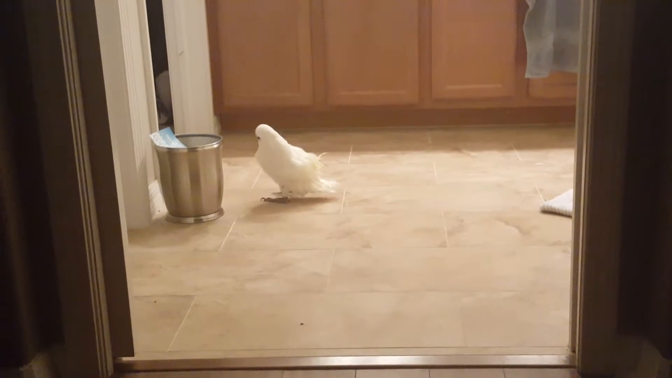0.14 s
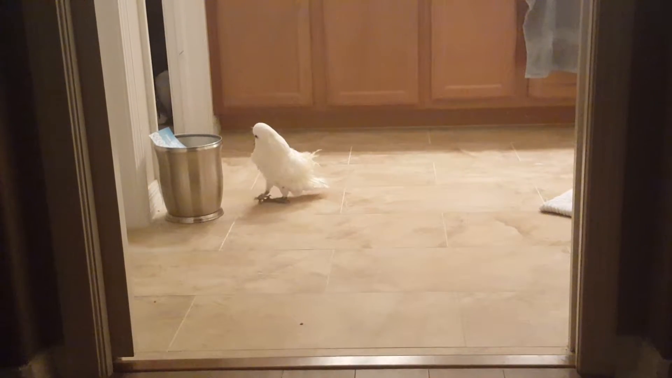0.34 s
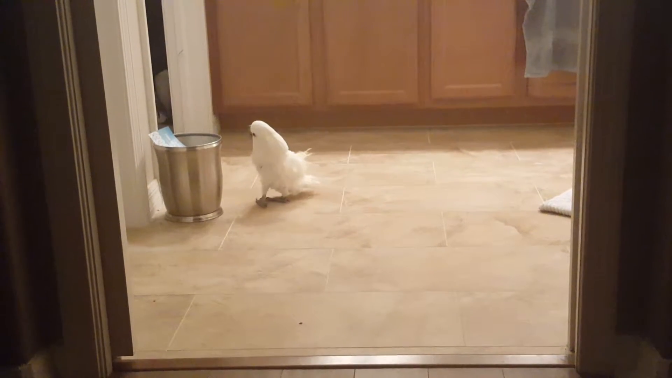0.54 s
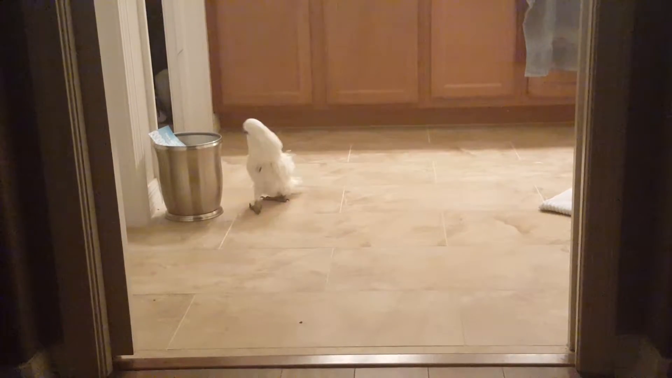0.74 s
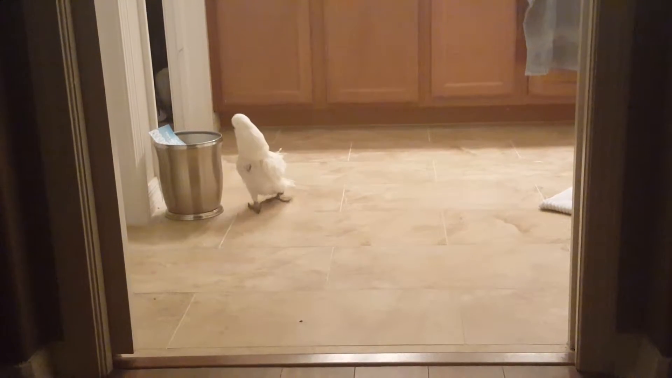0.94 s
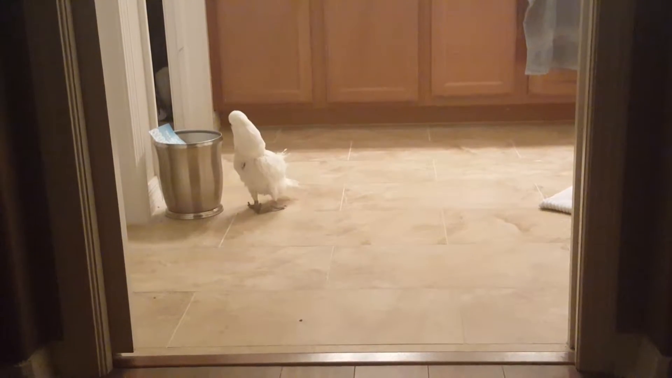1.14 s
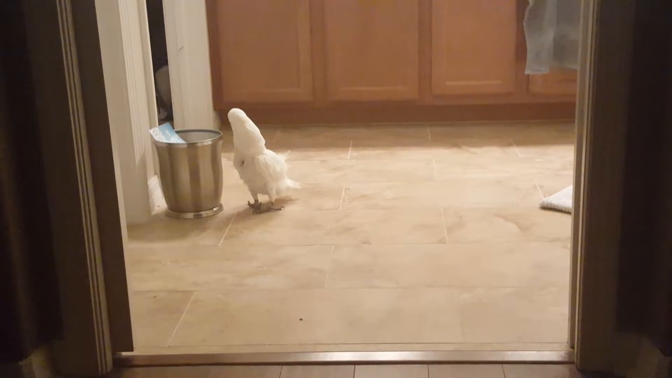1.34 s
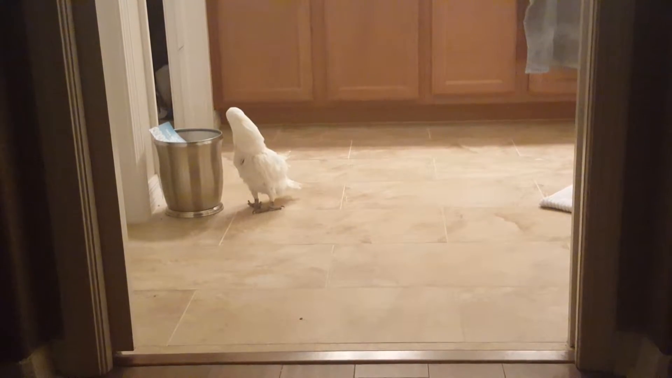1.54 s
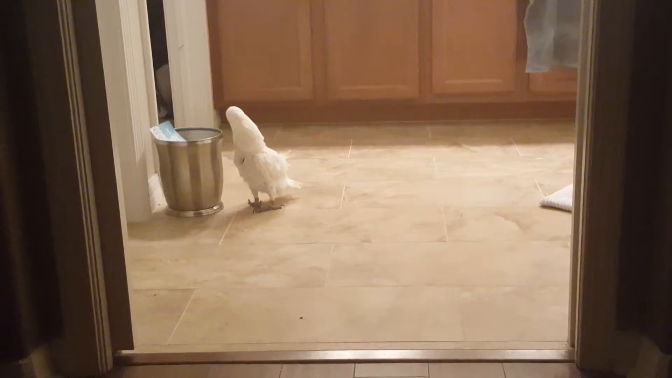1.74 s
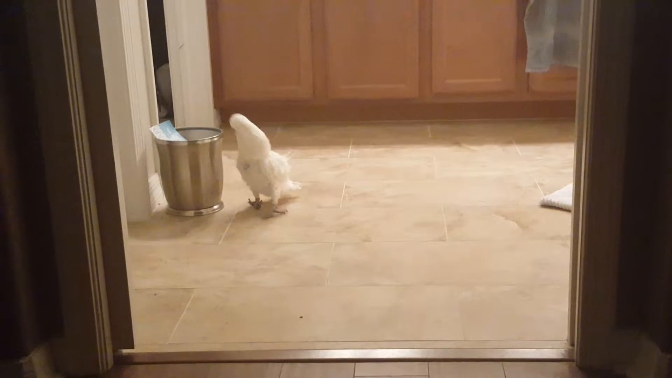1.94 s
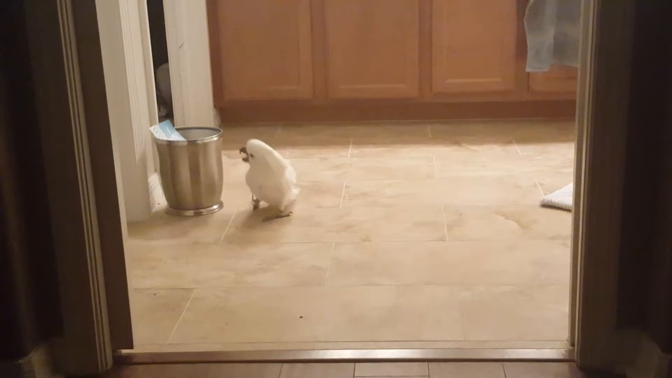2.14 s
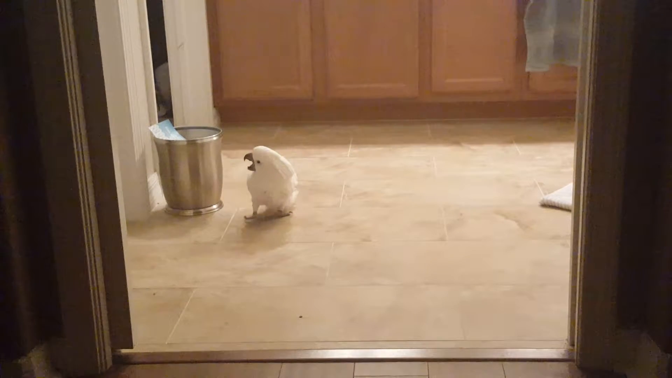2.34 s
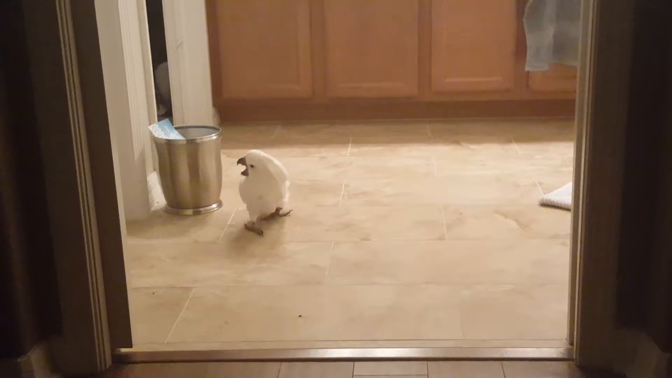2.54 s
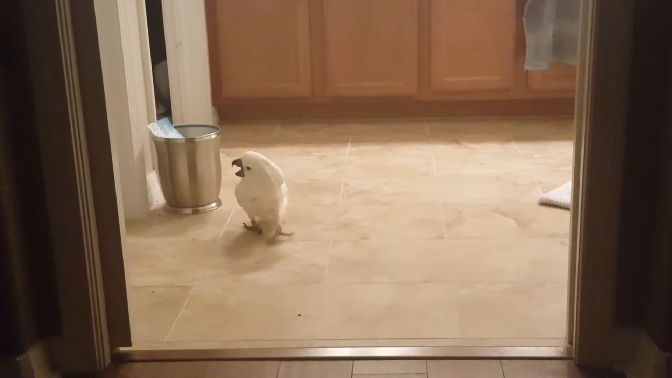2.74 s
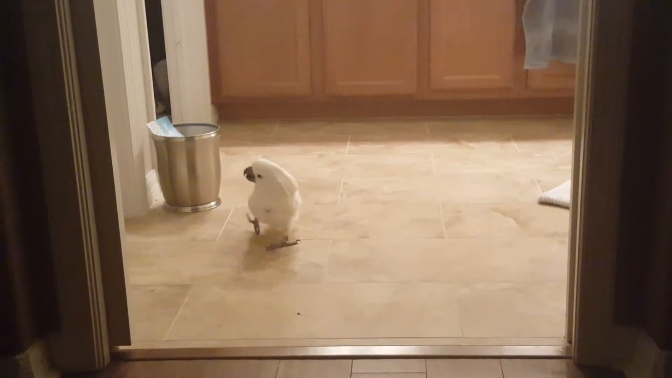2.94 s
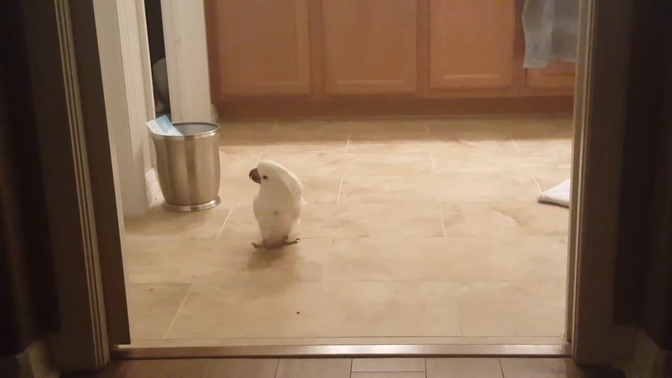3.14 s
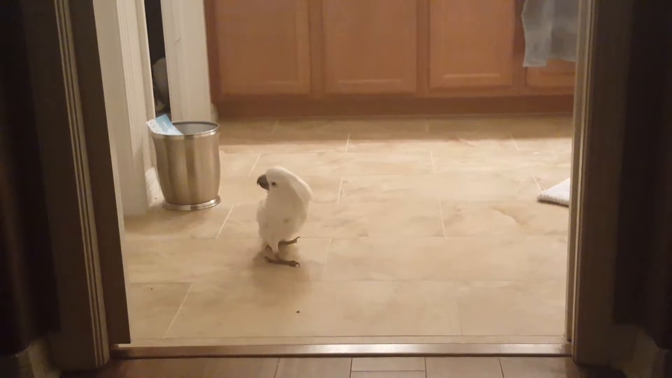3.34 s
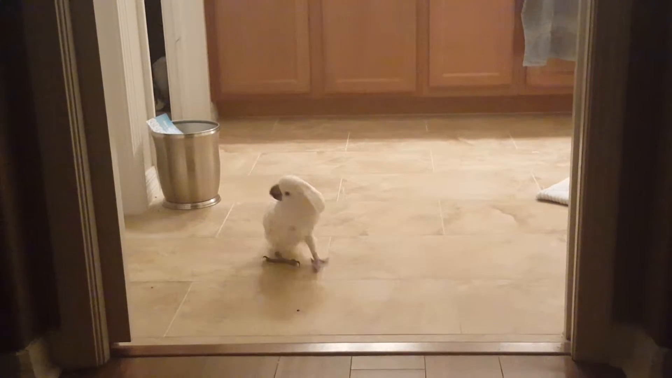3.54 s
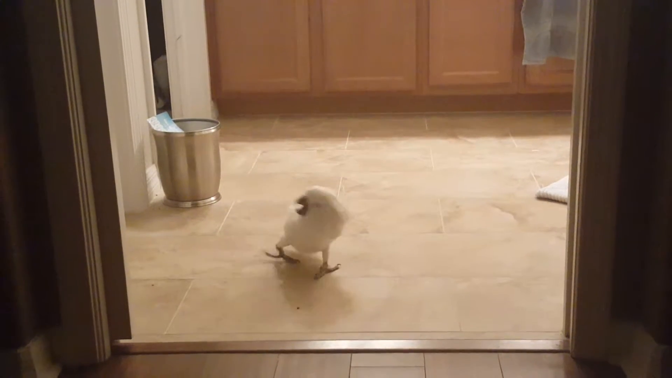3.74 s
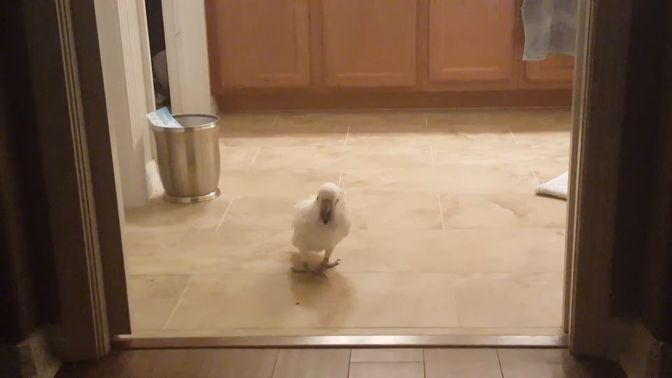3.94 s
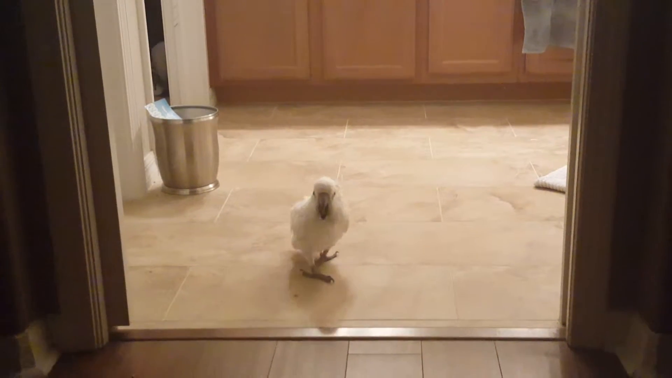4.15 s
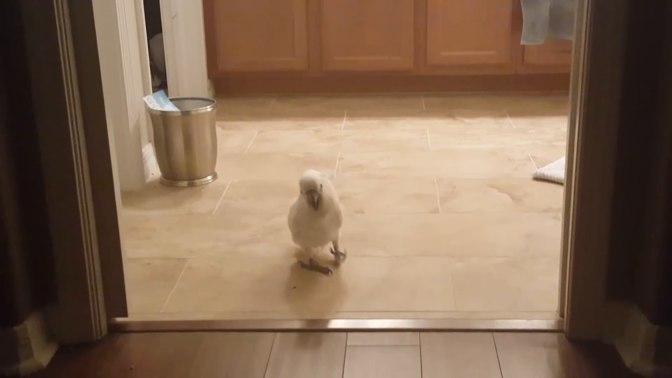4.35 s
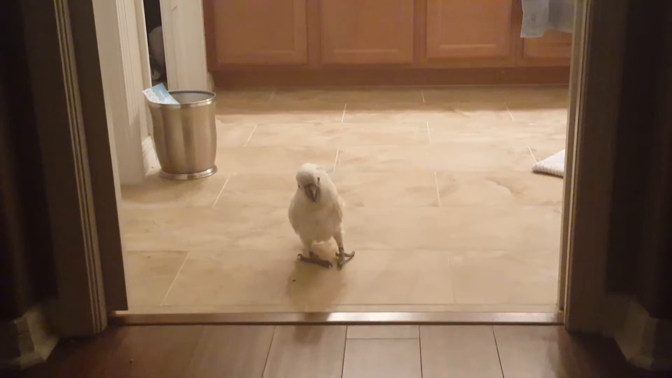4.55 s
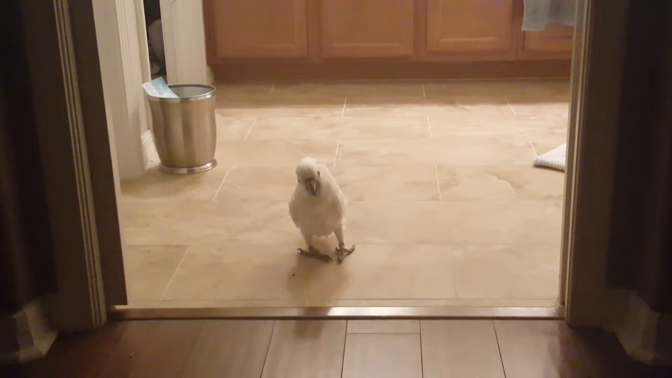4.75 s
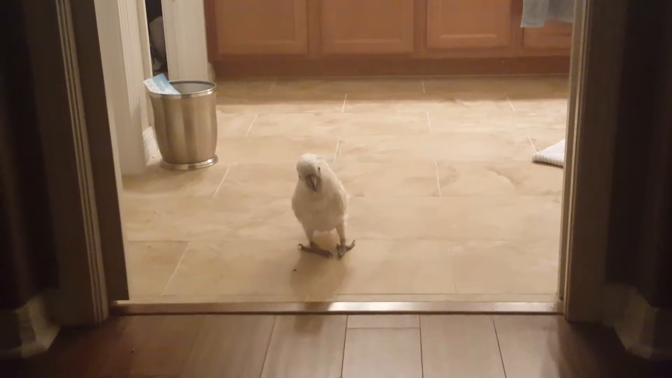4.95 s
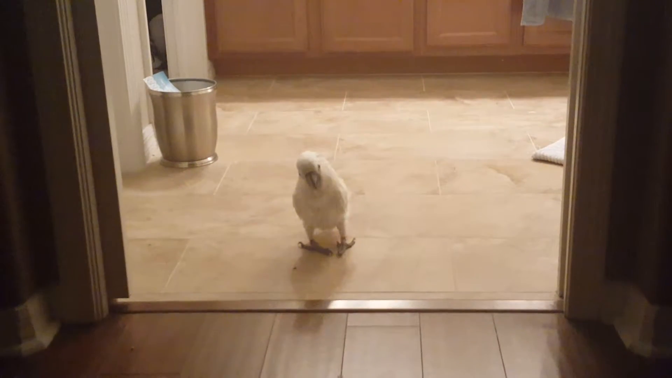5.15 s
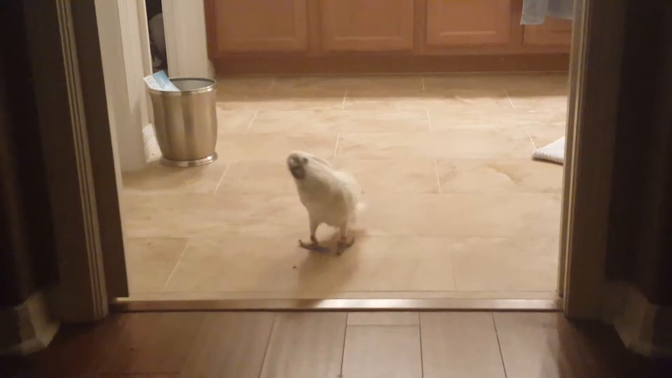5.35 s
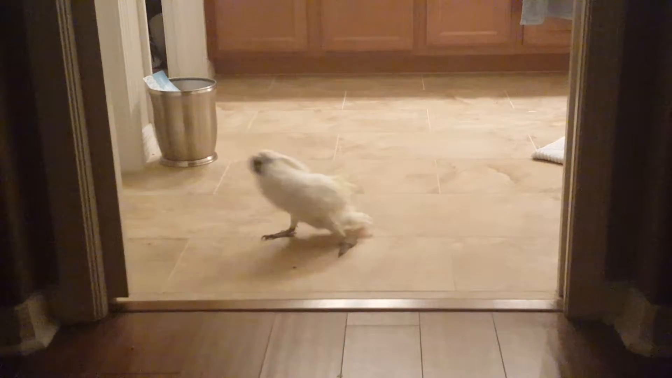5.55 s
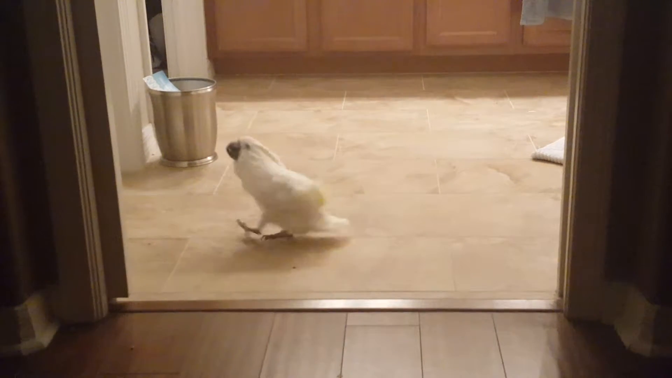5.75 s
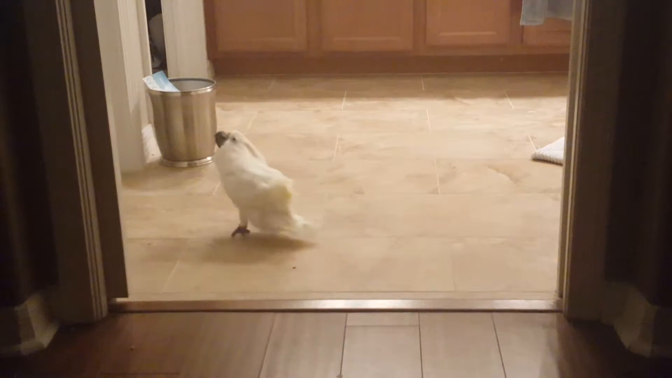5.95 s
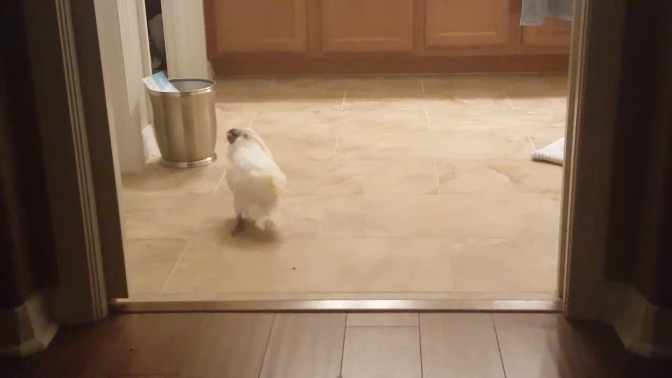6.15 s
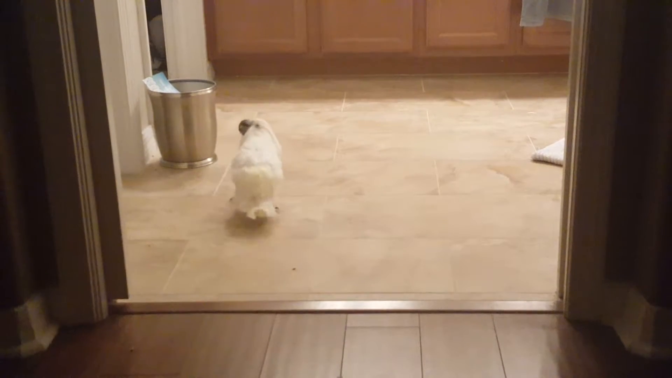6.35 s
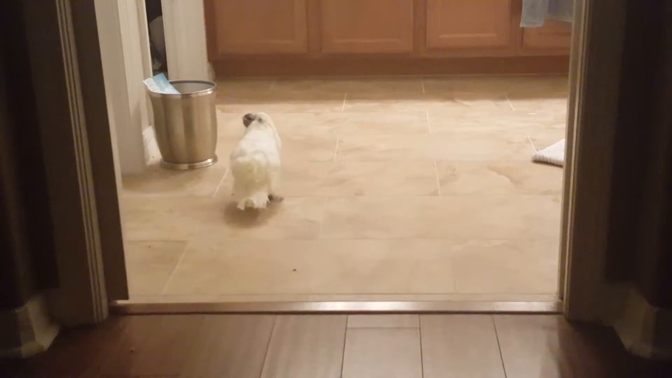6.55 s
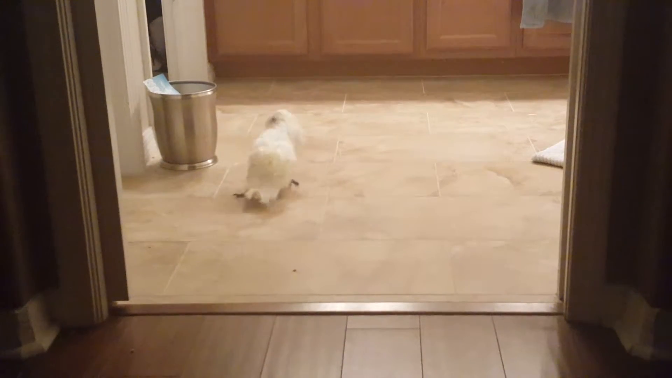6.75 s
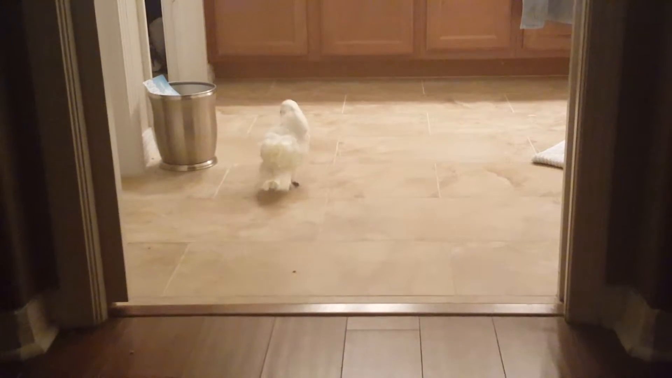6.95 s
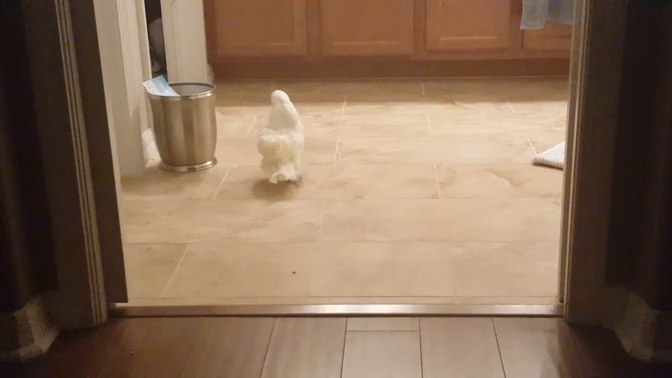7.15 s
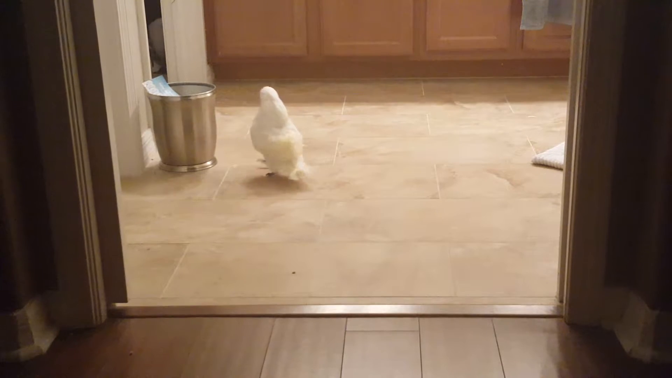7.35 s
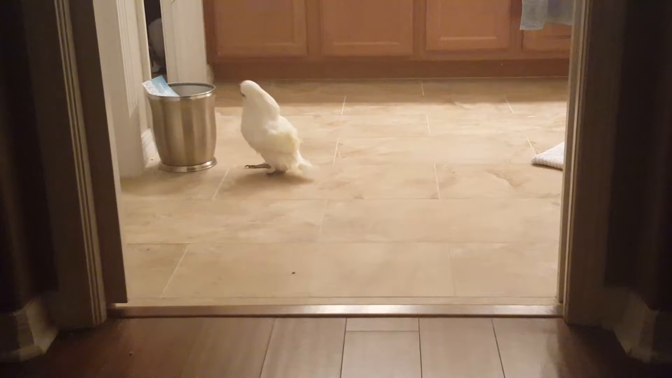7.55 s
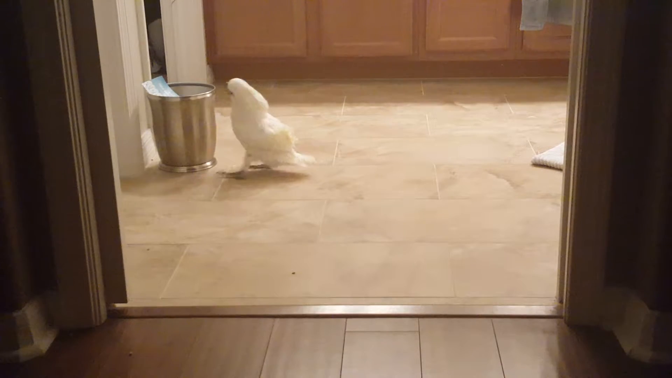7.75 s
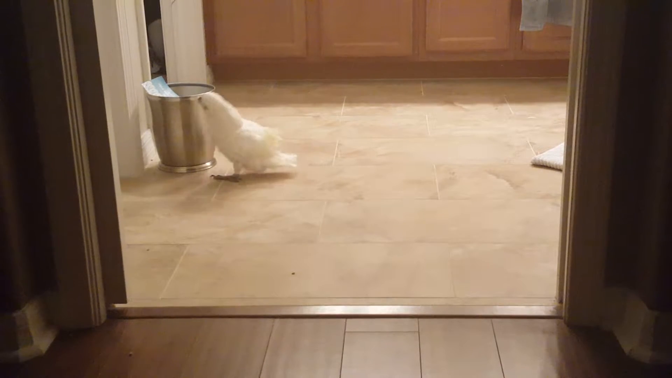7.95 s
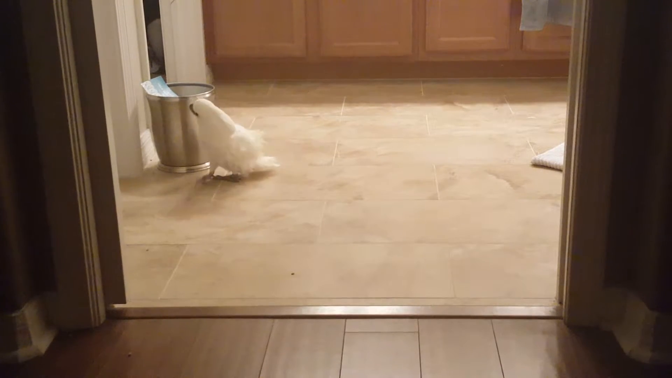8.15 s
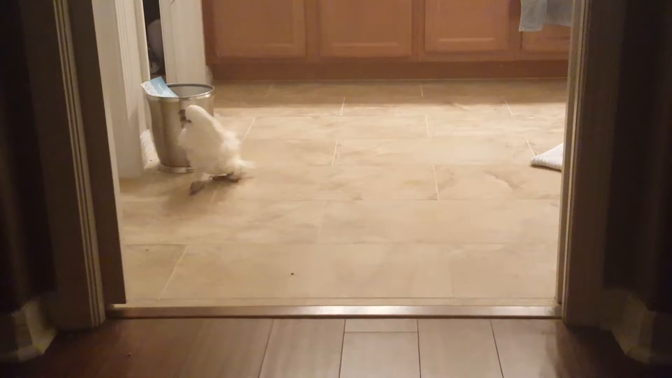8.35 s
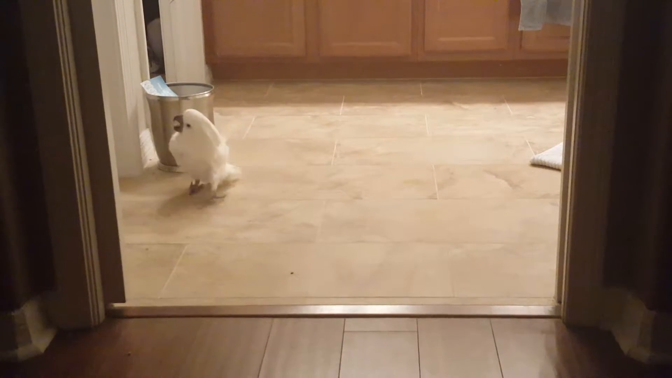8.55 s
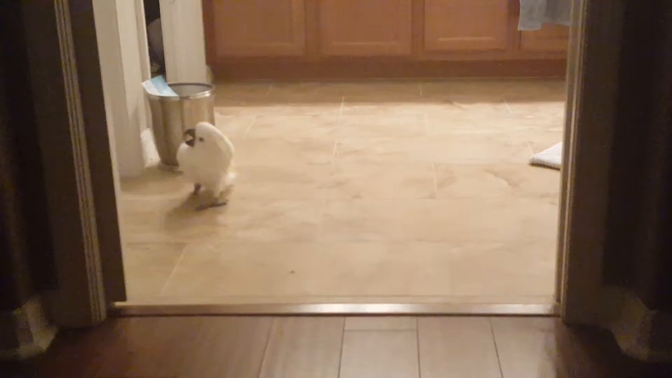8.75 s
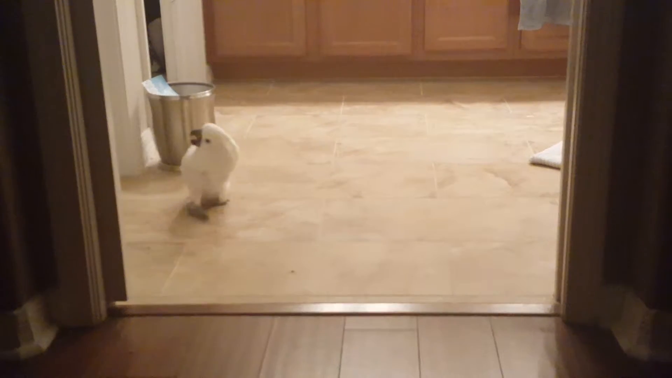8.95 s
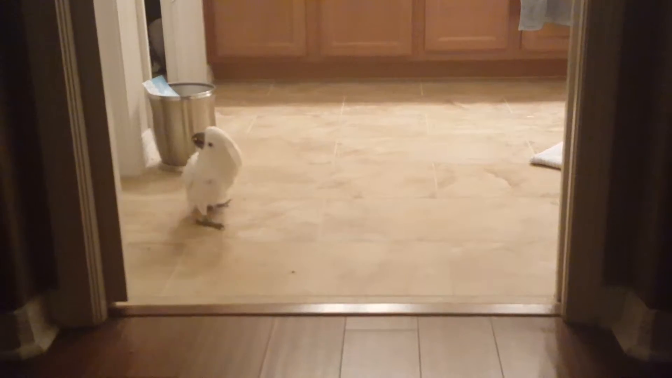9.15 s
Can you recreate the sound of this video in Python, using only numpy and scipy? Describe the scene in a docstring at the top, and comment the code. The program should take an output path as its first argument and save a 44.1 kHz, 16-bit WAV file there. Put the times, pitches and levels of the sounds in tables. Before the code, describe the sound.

A cockatoo on a kitchen floor screeches at once, then four more times: a pair close together, a pause, then another pair. Each is a half-second, blaring, rough scream with a short hard-room echo. Between them lie quiet room air, faint low hum, small claw ticks, feather rustles and dull handling bumps, mostly on the left. The handheld stereo microphone listens through a doorway and ducks after each call.

```python
"""A harsh screech is heard first, then four more: a cockatoo on a kitchen's tiled floor, through a doorway.
Its voice is two coupled membranes, with sum tones and chaos, filtered by a throat and echoed by the room.
Between calls lie shaped noise (room air), wavering sines (mains hum), low pulses (hands bumping the
microphones), crackle and snaps (feathers and claws). Gain control ducks each screech and recovers slowly."""
import sys
import numpy as np
from scipy import signal
from scipy.fft import rfft, irfft
from scipy.io import wavfile
from scipy.ndimage import uniform_filter1d

SR = 44100
rng = np.random.default_rng(int(sys.argv[2]) if len(sys.argv) > 2 else 0)


def int16_out(signal):
    """Quantize to a 16-bit WAV file."""
    q = np.round(np.clip(np.atleast_2d(signal).T, -1, 1) * 32767)
    wavfile.write(sys.argv[1], SR, q.astype(np.int16))


N = 406161

# room air: relative spectrum [f/Hz, level/dB per Hz]
AIR_SPECTRUM = [(20, -19), (60, -8.5), (126, -3), (203, -9.5), (365, -18.5), (603, -14), (797, -15.5),
                (1350, -17), (1600, -22), (2500, -20.5), (2960, -32.5), (5000, -30.5), (7650, -24),
                (10100, -42.5), (15800, -38)]
# level of the air over time [t/s, level/dB], partly making up for the gain control
AIR_LEVEL = [(0, 7), (1, 6), (1.6, 0.5), (2.2, 1.5), (3.201, 3), (3.801, 3), (4.8, 0.5), (5.4, 3),
             (5.7, 3.5), (6.3, 3.5), (6.898, 3), (8, 0), (8.5, 2), (9.3, 14.5)]
# stereo image of the air: [f/Hz, left-right likeness] and [f/Hz, left minus right level/dB]
AIR_LIKENESS = [(30, 0.28), (130, 0.41), (600, 0.94), (2000, 0.15), (5000, .3), (15000, .2)]
AIR_BALANCE = [(60, 1.5), (180, 1), (550, 0.5), (1650, -1), (4970, 2), (15000, 4.5)]
AIR_DB = -57  # rms to which the level over time is added
AIR_LAG = -16 / SR  # s; negative, so air and hum reach the left first

# mains and appliance tones: [f/Hz, rms level/dB about which each wavers, before panning]
HUM_TONES = [(119, -61), (240, -72), (360.7, -73.5), (527.6, -79.5), (602.9, -73.5), (904.4, -77),
             (1340, -79), (7600, -77)]

# hands bumping the microphones: [t/s, peak level/dB before panning, f/Hz, left minus right level/dB]
HAND_BUMPS = [(1.163, -48.5, 48.7, 23), (1.92, -45, 116, 2), (2.159, -43.5, 78.5, 9),
              (3.091, -44, 54.5, 20), (3.628, -47, 115, 17), (4.854, -47.5, 71, 21.0),
              (4.926, -44, 60.5, 19), (5.156, -42, 121.3, 19), (5.6, -47.5, 89.4, 9.5),
              (5.723, -46.5, 64.6, 13.5), (6.099, -47, 60, 14.5), (6.169, -48.5, 86.1, 10.5),
              (6.278, -44.5, 67.3, 21), (6.625, -55, 105, 0.5), (8.095, -41.5, 111.9, 12),
              (8.244, -44.5, 116.3, 15), (8.349, -56.5, 126.7, 2.0), (8.458, -43, 75.8, 8.5)]
TREMORS_PER_S, TREMOR_DB = 22, -58  # small random shifts of the hand: rate and lowest peak before panning

# claws and feathers: [t/s, level/dB before swell and panning, fade time/s, low body level/dB]
RUSTLES = [(3.031, -53, 0.043, -6), (3.4, -65.5, 0.029, -7.5), (3.548, -58.5, .03, -8),
           (5.535, -55.5, .035, -3), (5.658, -50, 0.11, 8.5), (5.895, -60.5, .03, -8),
           (6.007, -61, 0.032, -9.5), (6.169, -65, 0.029, -8), (6.61, -58.5, 0.028, -5),
           (6.75, -63, 0.029, -9), (6.907, -64, .03, -10), (8.32, -64, 0.035, -4),
           (8.496, -66, 0.023, -5.5)]
# spectrum of the crackle: [f/Hz, relative level/dB]
RUSTLE_SPECTRUM = [(300, -12), (480, 5), (620, 1), (900, -8), (2200, -19), (4000, -13.5), (8000, -9),
                   (10000, -25), (13000, -10), (16000, -8)]
# claws on tile: [t/s, peak level/dB before panning, left minus right level/dB]
CLAW_TICKS = [(.819, -41, 5.5), (1.0204, -36.5, 6)]

# kitchen echoes: decay [f/Hz, t60/s] and stereo image [f/Hz, left-right likeness]
KITCHEN_DECAY = [(250, .5), (660, 0.46), (1700, 0.53), (3000, 0.42), (6000, 0.44), (12000, 0.26)]
KITCHEN_LIKENESS = [(300, .93), (800, .93), (1300, .3), (2500, .45), (5000, .25), (12000, .25)]

# one row a screech: [onset t/s, release t/s, effort level/dB, release rate/(dB/s), beak opening as a factor
# on throat f, high tone level/dB, low tone level/dB, treble gained by facing the doorway/dB]
SCREECHES = [(-.012, .41, -1.5, 270, 1.027, -1, -24.5, 3.5),
             (2.242, 2.773, -1.5, 329, 1.012, -2.5, -25.5, 4),
             (3.81, 4.277, -1, 330.5, 1.042, -3, -23.5, 9), (6.961, 7.45, -.5, 290, 1.04, -6, -25.5, 1),
             (8.553, 8.953, -2, 198, 1.005, -2, -21, 5)]
# one list a screech: [t/s, high membrane f/Hz, low membrane f/Hz, roughness to be limited to 0-1]
VOICES = [
    [(0, 1256, 480, 0.57), (.025, 1400, 525.4, 0.9), (.055, 1432, 565.5, .3), (.1, 1447, 580, .12),
     (.15, 1476, 614.5, 0.12), (.18, 1500, 716.4, .6), (.23, 1542, 700, 0.81), (.32, 1522, 664.7, 0.72),
     (.41, 1445, 560.3, 0.76), (.52, 1400, 350.5, 0.78)],
    [(2.24, 495.6, 328.8, 0.9), (2.265, 1009, 399.7, 0.96), (2.3, 1330, 538.3, 0.79),
     (2.33, 1444, 586.2, 0.04), (2.38, 1483, 612.3, 0.18), (2.42, 1525, 626, 0.68),
     (2.47, 1536, 716.4, .61), (2.63, 1549, 709, .75), (2.76, 1489, 659.8, .85), (2.88, 1451, 400.7, 0.81)],
    [(3.81, 442, 298, 1.2), (3.83, 810, 537.5, 0.94), (3.86, 1293, 570.3, 0.83), (3.89, 1422, 595, 0.24),
     (3.98, 1547, 613, 0.53), (4.06, 1540, 600.3, 0.54), (4.13, 1555, 645, 0.64), (4.24, 1536, 598, 0.49),
     (4.28, 1491, 583.7, 0.84), (4.37, 1450, 450.7, .95)],
    [(6.965, 304, 249, 0.69), (7.0, 891.4, 399.6, 0.44), (7.025, 1199, 489.6, 0.26), (7.055, 1414, 571, .8),
     (7.1, 1531, 602, .48), (7.16, 1537, 623, 0.33), (7.2, 1577, 622.6, 0.04), (7.255, 1578, 627.8, .1),
     (7.268, 1558, 644.3, 0.66), (7.37, 1532, 576.5, 0.62), (7.45, 1538, 587, 0.87), (7.54, 1520, 400, .84)],
    [(8.554, 649.5, 348.7, 0.96), (8.57, 1043, 477.6, .9), (8.61, 1370, 549.6, 0.59),
     (8.66, 1420, 565.3, 0.47), (8.7, 1470, 600.5, 0.83), (8.8, 1487, 574.6, .75), (8.87, 1493, 595, 0.54),
     (8.95, 1466, 544, 0.61), (9.0, 1439, 523, 0.91), (9.07, 1420, 448, 0.94)],
]
# resonances of windpipe and throat at beak factor one: [f/Hz, width/Hz, relative level/dB]
THROAT = [(610, 820, -34.5), (1540, 510, -18), (2200, 1625, -8), (2849, 680, 0.5), (3990, 1700, -7),
          (6070, 2100, -15.5), (8200, 1600, -21), (11100, 830, -40.5), (13000, 1300, -31),
          (14800, 2800, -39)]
# strongest sum tones: [multiple of high f, multiple of low f], and their relative [level/dB]
LOUD_SUMS = [(0, 2), (1, 1), (0, 4), (1, 2), (2, 0), (1, 3), (1, 4), (2, 2)]
LOUD_SUMS_DB = [-4.5, -1.5, -6, 4, 2, .5, 0, 0.5]
# effort starts about this far down, closes the gap exponentially, then tires slowly
ATTACK_DB, ATTACK_S, SAG_DB_PER_S = 33.5, .021, 2.5
# the beak narrows per dB of missing effort, up to a limit, and closes slowly with time
BEAK_PER_DB, BEAK_SHUT, BEAK_SAG_PER_S = 0.03, 0.12, .17
HIGH_ROUGH_DB, LOW_ROUGH_DB = 14, 9  # loss of each pure tone per unit roughness
HIGH_FADE = 0.16  # extra dB lost by the high tone per dB of missing effort
TAUT_HZ = 1450  # the membranes count as slack while the high one is below this

EDGE_HZ = 15950  # upper band limit


def gain_of(db):
    """Logarithmic level: 20 dB is a factor of ten in amplitude."""
    return 10 ** (np.asarray(db) / 20)


def evened(x):
    """Normalization of power: scales to an rms of one."""
    return x / np.sqrt(np.mean(x ** 2) + 1e-20)


def read(points, hz):
    """Interpolation on a logarithmic frequency axis."""
    f, value = np.transpose(points)
    return np.interp(np.log(hz + 1), np.log(f + 1), value)


def add(mix, s, sound):
    """Superposition: adds a sound in place at s seconds, cut at the end of the mix."""
    part = mix[..., round(s * SR):][..., :sound.shape[-1]]
    part += sound[..., :part.shape[-1]]


def panned(lean_db):
    """Level difference between ears: half the lean raises the left, half lowers the right."""
    return np.array([[lean_db], [-lean_db]]) / 2


def wander(length, hz):
    """Low-passed chance: smooth noise of rms one that changes about hz times a second."""
    span = max(round(SR / hz), 2)
    smooth = uniform_filter1d(rng.standard_normal(length), span)
    return evened(uniform_filter1d(smooth, span))


def air():
    """Partly coherent noise: random short-time spectra with drifting patches and a level set over time."""
    frames, hz = N // 256 + 5, np.fft.rfftfreq(1024, 1 / SR)
    a, b, c, d, patches = rng.standard_normal((frames, 513, 5)).T
    patches = uniform_filter1d(patches, 10, 0)  # across frequency
    patches = evened(uniform_filter1d(patches, 14, 1))  # across time
    same = np.clip(read(AIR_LIKENESS, hz), -1, 1)[:, None]
    lean = read(AIR_BALANCE, hz)[:, None] / 2
    shift = np.exp(-2j * np.pi * hz * AIR_LAG)[:, None]
    left = a + 1j * b
    right = same * left + np.sqrt(1 - same ** 2) * (c + 1j * d)
    z = np.array([shift * left * gain_of(lean), right * gain_of(-lean)])
    z *= gain_of(read(AIR_SPECTRUM, hz)[:, None] + 1.3 * patches)
    noise = evened(signal.istft(z, nperseg=1024, noverlap=768)[1][:, :N])
    level_db = np.interp(np.arange(N) / SR, *np.transpose(AIR_LEVEL))
    return gain_of(AIR_DB + level_db) * noise


def hum():
    """Amplitude and frequency modulation: appliance tones waver and reach the left first."""
    tones = np.zeros(N)
    for hz, db in HUM_TONES:
        drift = 1 + .005 * wander(N, 8)
        level = np.sqrt(2) * gain_of(db + 2.9 * wander(N, 6))
        tones += level * np.sin(2 * np.pi * np.cumsum(hz * drift) / SR)
    return np.array([gain_of(2.0) * np.roll(tones, round(AIR_LAG * SR)), gain_of(-2.5) * tones])


def bumps():
    """Impulsive handling noise: short low pushes, stronger on the left, and many small random ones."""
    out, t = np.zeros((2, N)), np.arange(4000) / SR
    when, size, pitch, side = rng.random((round(TREMORS_PER_S * N / SR), 4)).T
    tremors = np.transpose([when * N / SR, TREMOR_DB - 1.1 * np.log(size), 35 * 4.0 ** pitch, 22 * side])
    for s, db, hz, lean_db in [*HAND_BUMPS, *tremors]:
        envelope = np.exp(-((t - .025) * hz / .55) ** 2)
        push = np.cos(2 * np.pi * hz * (t - .025)) * envelope
        add(out, s, gain_of(db + panned(lean_db)) * push)
    return out


def rustles():
    """Friction as filtered crackle: bright scrape over a duller body, swelling and fading."""
    out, t = np.zeros((2, N)), np.arange(8192) / SR
    hz = np.fft.rfftfreq(8192, 1 / SR)
    for s, db, length, body_db in RUSTLES:
        grains = rng.standard_normal((2, 8192)) * gain_of(2.1 * wander(8192, 400))
        grains = grains + 1.5 * grains[::-1]  # shared between the ears
        colour_db = read(RUSTLE_SPECTRUM, hz) + body_db / (1 + (hz / 6000) ** 4)
        grains = irfft(rfft(grains) * gain_of(colour_db))
        u = t / max(length, .001)
        swell = np.minimum(3 * u, 1) * np.exp(-u ** 2)
        add(out, s, gain_of(db + panned(3.0)) * evened(grains) * swell)
    return out


def ticks():
    """Impact of a hard claw: differenced noise dies within about a millisecond, a bright snap."""
    out, t = np.zeros((2, N)), np.arange(600) / SR
    for s, db, lean_db in CLAW_TICKS:
        snap = np.diff(rng.standard_normal(len(t) + 1)) * np.exp(-t / .0005)
        add(out, s, gain_of(db + panned(lean_db)) * snap / abs(snap).max())
    return out


def kitchen(x):
    """Reverberation: sparse echoes of random sign off tiles and cupboards, each band with its own decay."""
    taps = np.zeros((2, SR))
    at = np.arange(60, SR - 20, 20) + rng.integers(0, 20, (2, (SR - 61) // 20))
    np.put_along_axis(taps, at, rng.choice([-1., 1.], at.shape), 1)
    hz, t, (a, b) = signal.stft(taps, SR, nperseg=256)
    same = np.clip(read(KITCHEN_LIKENESS, hz), -1, 1)[:, None]
    z = np.array([a, same * a + np.sqrt(1 - same ** 2) * b])
    decay = gain_of(-60 * t / read(KITCHEN_DECAY, hz)[:, None])
    tail = signal.istft(z * decay, SR, nperseg=256)[1]
    return signal.fftconvolve(x[None], tail / np.linalg.norm(tail[0]), axes=1)


def sum_tone(m, n, high, low):
    """Intermodulation: one tone at m times the high plus n times the low frequency."""
    return np.cos(m * high + n * low + m * m + n * n)


def membrane_sums(high, low):
    """Nonlinear coupling: two membranes beating together give a lattice of sum tones."""
    orders = [(m, n) for m in range(9) for n in range(5) if m + n > 1]
    sums = evened(sum(gain_of(-1.5 * m - 0.82 * n) * sum_tone(m, n, high, low) for m, n in orders))
    loud = sum(gain_of(db) * sum_tone(m, n, high, low) for (m, n), db in zip(LOUD_SUMS, LOUD_SUMS_DB))
    return evened(sums + 0.2 * loud)


def membrane_chaos(low_hz):
    """Aperiodic vibration: irregular slaps of the low membrane, each with a decaying puff of noise."""
    length = len(low_hz)
    loose = np.cumsum(low_hz * (1 + .12 * wander(length, 300))) / SR  # cycles come early or late
    slaps = np.diff(np.floor(loose), prepend=0) * gain_of(3.1 * rng.standard_normal(length))
    puffs = (0.16 + np.exp(-(loose % 1) / 0.23)) * rng.standard_normal(length)
    chaos = evened(0.49 * evened(slaps) + 0.98 * evened(puffs))
    return chaos * gain_of(2.5 * wander(length, 90))


def throat(source, t, beak, slack, facing_db):
    """Source-filter principle: throat resonances move with the beak and flatten while membranes are slack."""
    f, frames, z = signal.stft(source, SR, nperseg=512, noverlap=384)
    f, frames = f[:, None], frames + t[0]
    opening = np.interp(frames, t, beak)
    response = sum(gain_of(db) / (1 + (2 * (f - centre * opening) / width) ** 2) ** 2
                   for centre, width, db in THROAT)
    response = response ** (1 - .45 * np.interp(frames, t, np.sqrt(slack)))
    response = response * gain_of(facing_db / (1 + (6000 / (f + 1)) ** 4))  # treble towards the doorway
    return evened(signal.istft(z * response, SR, nperseg=512, noverlap=384)[1][:len(t)])


def screech(voice, onset, release, effort_db, release_db_per_s, open_beak, high_db, low_db, facing_db):
    """Coupled oscillators: effort and tension set the share of tones and chaos passing the throat."""
    s, *columns = np.transpose(voice)
    t = np.arange(s[0], s[-1], 1 / SR)
    high_hz, low_hz, rough = (np.interp(t, s, c) for c in columns)
    lack_db = ATTACK_DB * np.exp(-(t - onset) / ATTACK_S) + release_db_per_s * np.maximum(t - release, 0)
    beak = open_beak - np.minimum(BEAK_PER_DB * lack_db, BEAK_SHUT) - BEAK_SAG_PER_S * (t - onset)
    slack = np.clip(1 - high_hz / TAUT_HZ, 0, 1)
    rough = np.clip(rough, 0, 1) * (1 - np.sqrt(slack) * .2)

    # phases in radians; roughness unsteadies both membranes
    high = 2 * np.pi * np.cumsum(high_hz * (1 + .025 * rough ** 2 * wander(len(t), 70))) / SR
    low = 2 * np.pi * np.cumsum(low_hz * (1 + .035 * rough * wander(len(t), 90))) / SR
    overtones = evened(sum(np.cos(m * high) for m in range(2, 11)))
    # slackness trades the sum tones for overtones of the high membrane alone
    voiced = (1 - slack) ** 2 * membrane_sums(high, low) + 2.3 * slack * overtones
    source = np.sqrt(1 - rough) * voiced + np.sqrt(rough) * membrane_chaos(low_hz)
    call = throat(source, t, beak, slack, facing_db)

    # the two fundamentals bypass the throat
    high_level_db = high_db - HIGH_ROUGH_DB * rough - HIGH_FADE * lack_db + 3.0 * rough * wander(len(t), 40)
    low_level_db = low_db - LOW_ROUGH_DB * rough + 3.0 * rough * wander(len(t), 40)
    tones = gain_of(high_level_db) * np.sin(high) + gain_of(low_level_db) * np.sin(low)
    fade = np.minimum(np.minimum(t - s[0], s[-1] - t) / 0.0062, 1)
    effort = gain_of(effort_db - lack_db - SAG_DB_PER_S * (t - onset))
    return s[0], effort * (call + tones) * fade


def scene():
    """Superposition: direct and reverberant screeches, each with fresh echoes, over the quiet sounds."""
    out = air() + hum() + bumps() + rustles() + ticks()
    for voice, row in zip(VOICES, SCREECHES):
        s, call = screech(voice, *row)
        direct = np.array([gain_of(-4.0) * np.roll(call, -2), gain_of(-7.0) * call])  # left leads by 2 samples
        add(out, s, direct)
        add(out, s, gain_of(-2.0) * kitchen(call))
    return out


def record(dry):
    """Dynamic compression: gain falls quickly and recovers slowly, between a bass cut and a band limit."""
    dry = signal.sosfilt(signal.butter(2, 48, "high", fs=SR, output="sos"), dry)
    power_db = 10 * np.log10(abs(uniform_filter1d((dry ** 2).mean(0), 2000)) + 1e-12)
    fall = np.arange(N) * 26.5 / SR  # the held level falls 26.5 dB a second
    held_db = np.maximum.accumulate(power_db + fall) - fall
    over_db = np.maximum(held_db + 34, 0)  # excess above -34 dB
    ducked = dry / gain_of(0.3 * uniform_filter1d(over_db, 400))
    ducked = ducked / (1 + ducked ** 4) ** .25  # peaks round off near full scale
    band = signal.firwin(1023, EDGE_HZ, window=("kaiser", 9), fs=SR)
    return signal.oaconvolve(ducked, band[None], "same")


dry = scene()
out = record(dry)
int16_out(out)
```